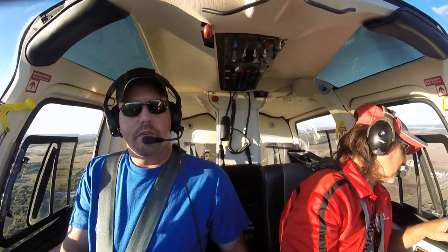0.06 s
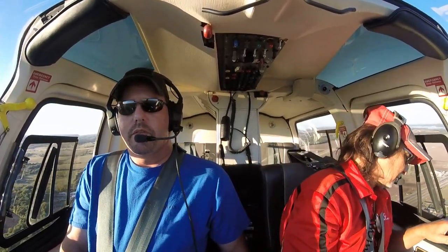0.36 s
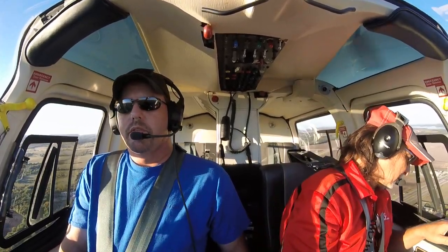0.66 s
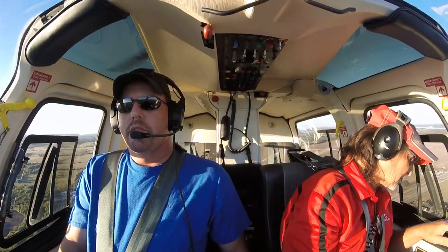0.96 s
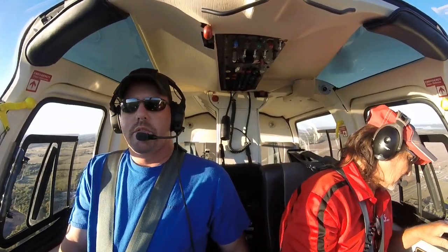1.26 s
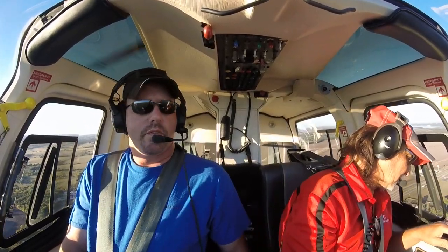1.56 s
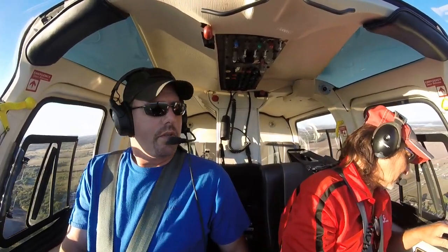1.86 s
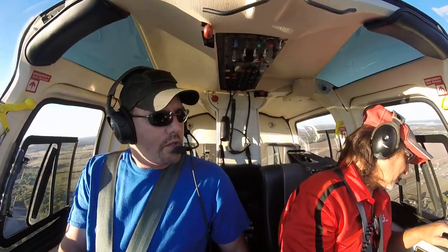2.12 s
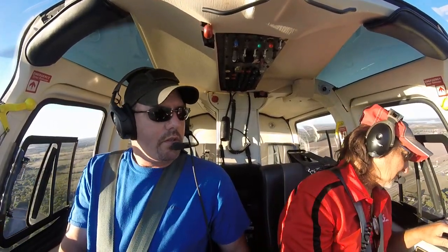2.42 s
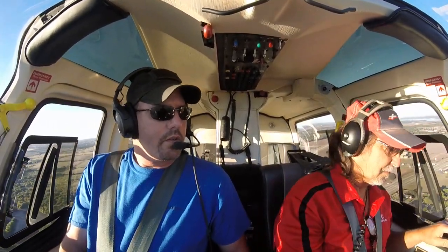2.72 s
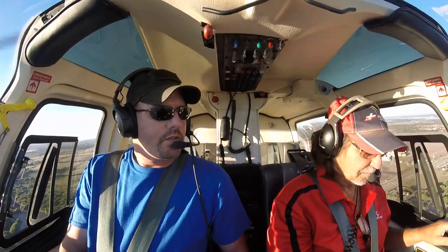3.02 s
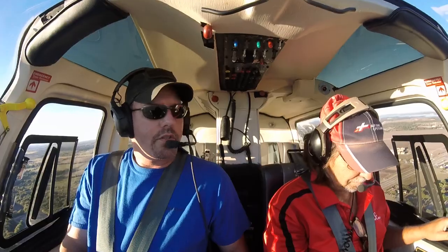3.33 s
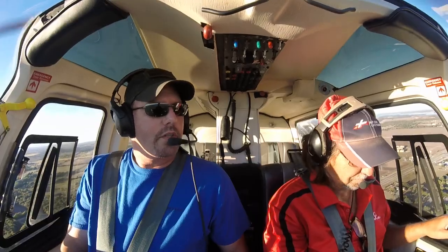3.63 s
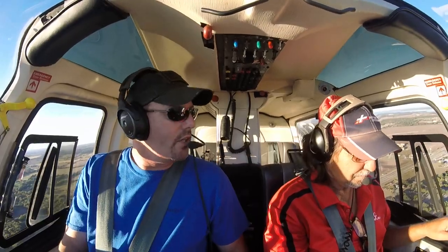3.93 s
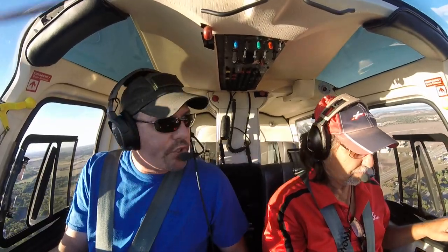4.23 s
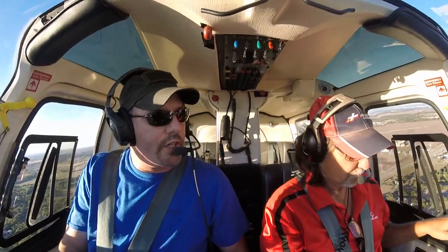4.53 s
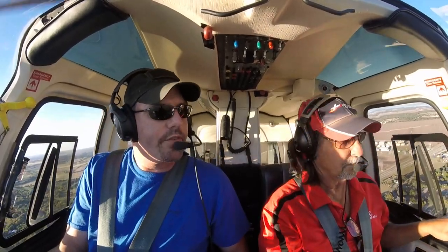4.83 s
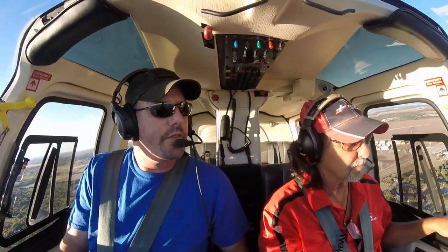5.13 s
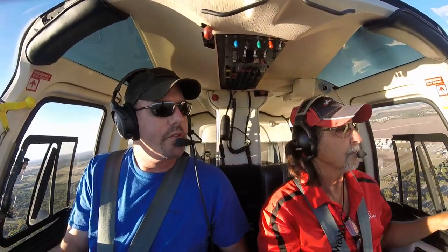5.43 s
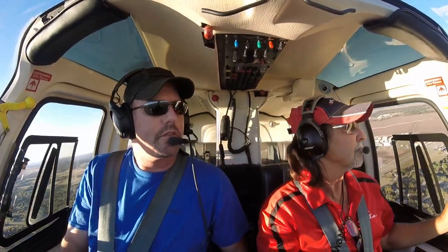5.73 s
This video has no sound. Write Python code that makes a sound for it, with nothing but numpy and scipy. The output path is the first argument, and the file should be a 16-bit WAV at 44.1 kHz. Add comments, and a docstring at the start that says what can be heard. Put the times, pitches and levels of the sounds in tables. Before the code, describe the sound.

A steady, loud helicopter drone heard inside the cabin, with throbbing rotors, singing gears and a thin turbine whine.

```python
"""A helicopter's tail rotor drones, heard inside the cabin in steady cruise, over the slower beat of the
main rotor. The drone throbs by beating against main rotor harmonics and the shaft hums beside it.
Gears sing, their casing howls and the turbine adds a thin whine. Airflow booms in the cabin, the
transmission rings the roof panels, and a loose fitting chatters five times per main rotor turn."""
import sys
import numpy as np
from scipy import signal
from scipy.fft import rfft, irfft
from scipy.io import wavfile
from scipy.ndimage import uniform_filter1d, minimum_filter1d

SR = 44100
rng = np.random.default_rng(int(sys.argv[2]) if len(sys.argv) > 2 else 0)


def to_wav(sig):
    """Store sig (one row per channel, or 1-D mono) as 16-bit WAV at the path in sys.argv[1].

    Samples outside -1..1 are clipped; the rate is SR.
    """
    pcm = np.clip(np.atleast_2d(sig), -1, 1) * 32767
    pcm = np.round(pcm).astype(np.int16)
    wavfile.write(sys.argv[1], SR, pcm.T)  # frames by channels


N = 263269
TIME_S = np.arange(N) / SR
BINS_HZ = np.fft.rfftfreq(N, 1 / SR)
ROTOR_HZ, TAIL_BLADE_HZ = 5.872, 43.47
MAIN_BLADE_HZ = 2 * ROTOR_HZ  # two blades


def undb(db):
    """Decibels to gain."""
    return 10 ** (np.asarray(db) / 20)


def curve(table):
    """A (time, value) table interpolated at every sample."""
    times_s, values = np.transpose(table)
    return np.interp(TIME_S, times_s, values)


def wander(rate_hz):
    """Smooth random drift of unit spread, up to about rate_hz."""
    lowpass = np.exp(-(BINS_HZ / rate_hz) ** 2) * (BINS_HZ > 0)
    drift = irfft(rfft(rng.standard_normal(N)) * lowpass, N)
    return drift / drift.std()


def tone(cycles):
    """Unit-rms sine following a cycle count, random start phase."""
    return np.sqrt(2) * np.sin(2 * np.pi * (cycles + rng.random()))


def wavering_tones(table, flutter_db, flutter_hz, sway_cycles):
    """Sum of steady tones, each wavering in level and phase."""
    return sum(undb(db + flutter_db * wander(flutter_hz)) * tone(hz * TIME_S + sway_cycles * wander(1.34))
               for hz, db in table)


def noise(density):
    """Noise with the given amplitude per root Hz in each bin."""
    return irfft(rfft(rng.standard_normal(N)) * density, N) * np.sqrt(SR / 2)


def broad_noise(spectrum):
    """Noise following a spectrum, falling 36 dB/octave above its last point."""
    hz, db = np.transpose(spectrum)
    density = undb(np.interp(np.log(BINS_HZ + 1e-9), np.log(hz), db))
    return noise(density / np.maximum(BINS_HZ / hz[-1], 1) ** 6)


def resonant_noise(modes):
    """Noise through steep-sided resonances that add in power."""
    power = sum((undb(db) / (1 + 2 * ((BINS_HZ - hz) / width_hz) ** 2)) ** 2
                for hz, width_hz, db in modes)
    return noise(np.sqrt(power))


# Tail blade harmonics: order, level/dB re drone_db
TAIL_HARMONICS = [(1, 0), (2, -17.5), (3, -16.5), (4, -24.5), (5, -38.5), (6, -38), (8, -35.5), (10, -47),
                  (19, -62.5)]


def tail_rotor(drone_db=-11, drift_db=0.7, flutter_db=0.2, sway_cycles=0.0059):
    """Near-steady blade-rate drone; its overtones flutter slightly in the main rotor's wake."""
    cycles = TAIL_BLADE_HZ * TIME_S + sway_cycles * wander(4)
    drone = 0
    for order, db in TAIL_HARMONICS:
        swell_db = (drift_db if order == 1 else flutter_db) * wander(2)
        drone += undb(drone_db + db + swell_db) * tone(order * cycles)
    return drone


# Main blade harmonics: order, rms level/dB
MAIN_HARMONICS = [(1, -39), (2, -49), (3, -35), (4, -38), (5, -31.5), (6, -28), (7, -34), (9, -38.5),
                  (10, -34)]


def main_rotor(flutter_db=2):
    """Blades pass over the roof; uneven air shakes each harmonic."""
    cycles = MAIN_BLADE_HZ * TIME_S
    return sum(undb(db + flutter_db * wander(1)) * tone(order * cycles) for order, db in MAIN_HARMONICS)


# Low rotor overtones and sidebands, with shaft hums above: f/Hz, rms level/dB
HUM_TONES = [(37.6, -25), (41.1, -27), (63.46, -36), (66.91, -34), (76.8, -42), (102.3, -36.5),
             (110.42, -30.5), (146.0, -36.5), (195.21, -28.5), (204.57, -26)]


def hums():
    """Low rotor overtones and sidebands, with shaft hums above; the top pair beats at about 9 Hz."""
    return wavering_tones(HUM_TONES, flutter_db=1, flutter_hz=2.4, sway_cycles=0.028)


# Gear and accessory tones: f/Hz, rms level/dB
GEAR_TONES = [(574.9, -64), (580.7, -55), (1161.3, -50.5), (1741.6, -58), (1789, -59), (1925, -48),
              (2305, -62), (2386, -60.5), (2717.3, -48.5), (5012, -73), (5225, -77), (5319, -80),
              (5857, -75)]


def gears():
    """Gears and accessories sing at fixed pitches."""
    return wavering_tones(GEAR_TONES, flutter_db=2, flutter_hz=5, sway_cycles=0.08)


def throbbing_gear(pitch_hz=595.7, mean_db=-54, depth_db=5, peak_s=0.125, flutter_db=1.5):
    """A low gear tone swells as each rotor turn loads the mast."""
    load = np.cos(2 * np.pi * ROTOR_HZ * (TIME_S - peak_s))
    level_db = mean_db + depth_db * load + flutter_db * wander(5)
    return undb(level_db) * tone(pitch_hz * TIME_S + 0.066 * wander(2))


# Turbine blade pitch: t/s, f/Hz
TURBINE_PITCH = [(0, 5110), (1.1, 5123), (1.6, 5116), (3.3, 5119), (5.97, 5112)]
# Turbine whine: t/s, level/dB re gain_db
TURBINE_LEVEL = [(0.05, -62), (0.25, -55.5), (1.57, -56), (2.13, -66.5), (2.21, -62), (2.67, -63.5),
                 (2.95, -55), (4.45, -64.5), (4.83, -55), (5.97, -57)]


def turbine(gain_db=4, flutter_db=1, sway_cycles=0.059):
    """The thin blade tone slowly swells and fades, with a fast flutter."""
    cycles = np.cumsum(curve(TURBINE_PITCH)) / SR + sway_cycles * wander(23)
    level_db = gain_db + curve(TURBINE_LEVEL) + flutter_db * wander(22)
    return undb(level_db) * tone(cycles)


def gear_mesh(pitch_hz=1943.2, start_db=-48.5, rise_db=5, midpoint_s=1.8, rise_s=0.15, flutter_db=1.5):
    """The loudest mesh tone rises once in level and holds."""
    ramp = np.clip((TIME_S - midpoint_s) / rise_s + 0.5, 0, 1)
    level_db = start_db + rise_db * ramp + flutter_db * wander(12)
    return undb(level_db) * tone(pitch_hz * TIME_S + 0.059 * wander(2.1))


# Cabin boom: f/Hz, level/dB in 1 Hz
BOOM_SPECTRUM = [(14, -69.5), (26, -56.5), (33, -46.5), (38, -44), (50, -50), (74, -42.5), (84, -52.5),
                 (112, -39.5), (135, -47), (178, -49.5), (205, -47.5), (235, -63.5), (330, -89.5)]


def airflow(gust_db=1):
    """Turbulence on the skin booms in the cabin's low modes."""
    return undb(gust_db * wander(3)) * broad_noise(BOOM_SPECTRUM)


# Transmission and engine rush: f/Hz, level/dB in 1 Hz
RUSH_SPECTRUM = [(150, -74.5), (260, -68), (470, -66), (500, -72.5), (700, -73.5), (910, -77),
                 (1250, -70.5), (2300, -68.5), (2900, -74), (3600, -78.5), (3950, -88), (4650, -88),
                 (4900, -100), (7000, -108)]
# Roof panel resonances: f/Hz, width/Hz, level/dB in 1 Hz
PANEL_MODES = [(328.5, 44, -56), (591, 43, -65), (813, 36, -72.5), (1088, 52, -71), (1751, 43, -66.5),
               (2187, 70, -69.5), (3075, 160, -74.5), (3575, 190, -77.5), (4270, 160, -85),
               (5780, 1240, -91.5), (6420, 290, -92.5)]


def transmission(flicker_db=1.3, swell_db=0.41, shake_db=0.8):
    """Machine noise and the panels it rings swell together and shake with the drone."""
    rush = broad_noise(RUSH_SPECTRUM)
    panels = undb(flicker_db * wander(44)) * resonant_noise(PANEL_MODES)
    shake = np.cos(2 * np.pi * TAIL_BLADE_HZ * TIME_S)
    return undb(swell_db * wander(1.3) + shake_db * shake) * (rush + panels)


# Gearbox casing resonances: f/Hz, width/Hz, level/dB in 1 Hz
CASING_MODES = [(1257, 42, -64.5), (1366, 91, -59.5), (1433, 180, -66), (2505, 84, -66.5), (2583, 56, -64)]


def gearbox(flutter_db=0.65):
    """The casing howls, fluttering as the gear load shifts."""
    return undb(flutter_db * wander(12)) * resonant_noise(CASING_MODES)


def knock_envelope(decay_s, rise_s, buzz, blade_db, first_s=0.0193, scatter_db=1.5):
    """Five knocks per rotor turn over a buzz floor, modulated at main blade rate; unit rms."""
    knock_hz = 5 * ROTOR_HZ
    index, fraction = np.divmod((TIME_S - first_s) * knock_hz + 1, 1)
    age_s = fraction / knock_hz
    burst = np.exp(-age_s / decay_s) * (1 - np.exp(-age_s / rise_s)) ** 2
    strengths = undb(scatter_db * rng.standard_normal(int(index[-1]) + 1))
    knocks = strengths[index.astype(int)] * burst / burst.max()
    blade_gain = undb(blade_db * np.cos(2 * np.pi * MAIN_BLADE_HZ * TIME_S))
    envelope = np.hypot(buzz, knocks) * blade_gain
    return envelope / np.sqrt(np.mean(envelope ** 2))


# Fitting rasp: f/Hz, level/dB in 1 Hz
RASP_SPECTRUM = [(1500, -93), (2500, -75.5), (3400, -82.5), (4100, -96), (5000, -103), (6600, -90),
                 (7100, -103), (7600, -99), (8400, -99), (9000, -102), (10000, -107), (11700, -110),
                 (12300, -117), (15000, -123)]
# Fitting resonances: f/Hz, width/Hz, level/dB in 1 Hz
FITTING_MODES = [(2550, 100, -72.5), (6450, 300, -98.5), (7900, 200, -91), (8500, 190, -101),
                 (9380, 590, -99), (13300, 500, -113)]


def loose_fitting():
    """A fitting rasps on its seat, harder as a blade passes, and rings briefly at each knock."""
    rasp = knock_envelope(decay_s=0.0029, rise_s=0.002, buzz=0.67, blade_db=3.5)
    rasp *= broad_noise(RASP_SPECTRUM)
    ring = knock_envelope(decay_s=0.0026, rise_s=0.0017, buzz=0.32, blade_db=-0.5)
    ring *= resonant_noise(FITTING_MODES)
    return rasp + ring


def scene():
    """Mono mix at the front of the cabin; all sources run throughout."""
    drivetrain = hums() + gears() + throbbing_gear()
    rotors = main_rotor() + tail_rotor()
    whines = turbine() + gear_mesh()
    noises = airflow() + transmission() + gearbox() + loose_fitting()
    return (rotors + drivetrain + whines + noises)[None]


def record(dry):
    """A limiter eases down the loudest swells; a low-pass cuts the top."""
    ceiling, window_samples, cutoff_hz = 0.76, SR // 50, 15500
    allowed_gain = np.minimum(1, ceiling / (np.abs(dry) + 1e-9))
    held_gain = minimum_filter1d(allowed_gain, window_samples)
    smooth_gain = uniform_filter1d(held_gain, window_samples)
    lowpass = signal.ellip(8, 0.2, 70, cutoff_hz, fs=SR, output="sos")
    return signal.sosfilt(lowpass, smooth_gain * dry)


dry = scene()
out = record(dry)
to_wav(out)
```